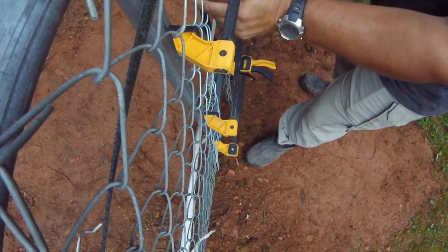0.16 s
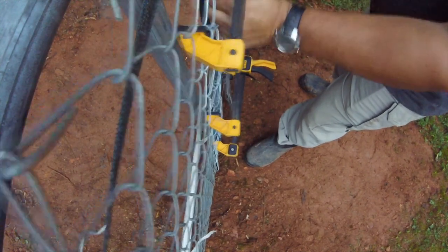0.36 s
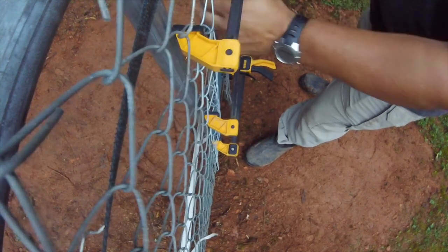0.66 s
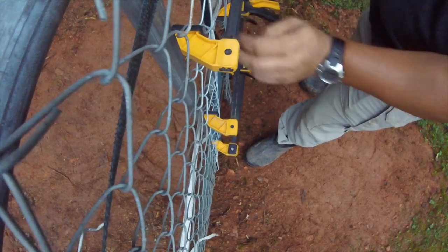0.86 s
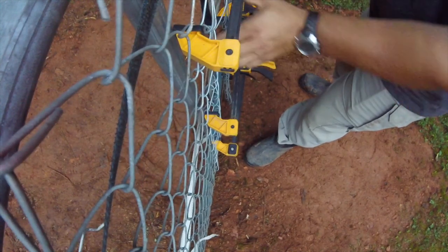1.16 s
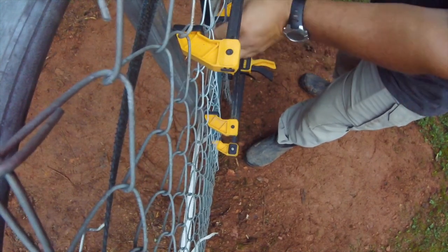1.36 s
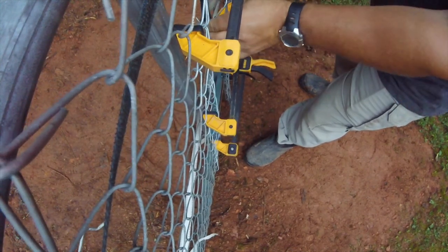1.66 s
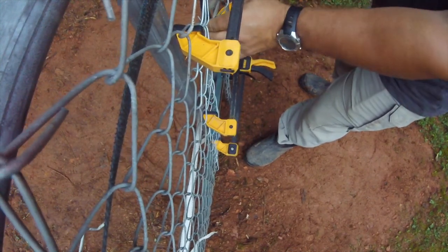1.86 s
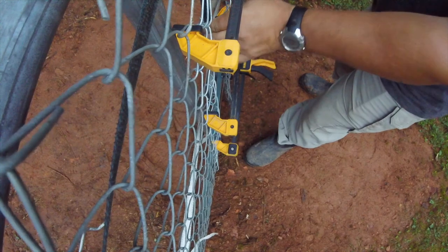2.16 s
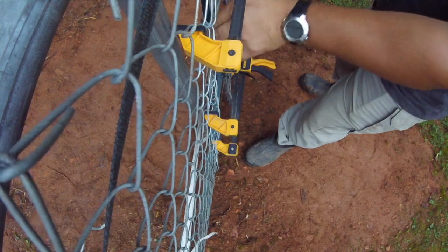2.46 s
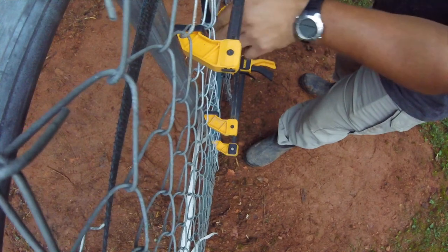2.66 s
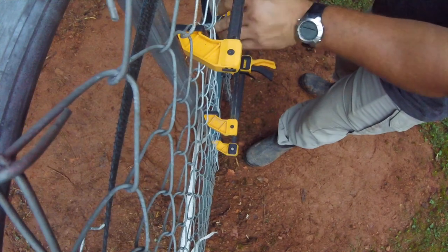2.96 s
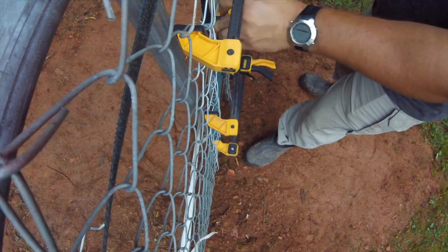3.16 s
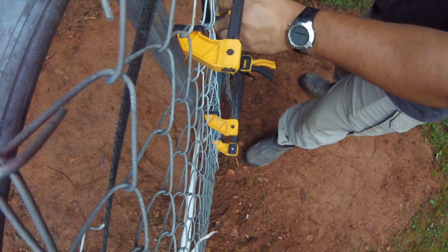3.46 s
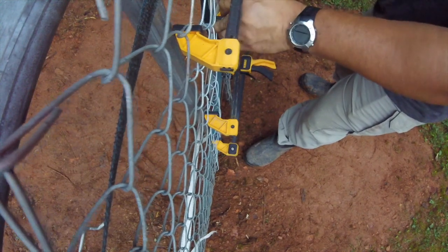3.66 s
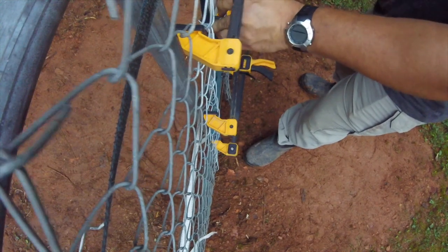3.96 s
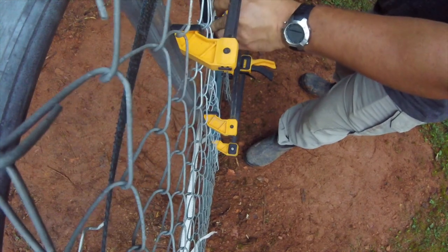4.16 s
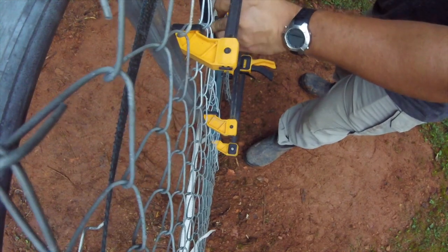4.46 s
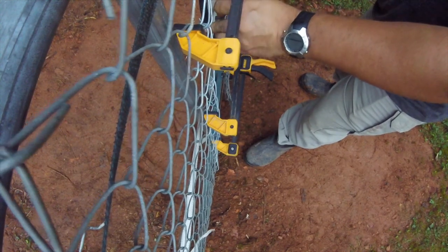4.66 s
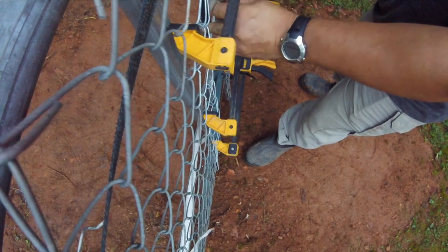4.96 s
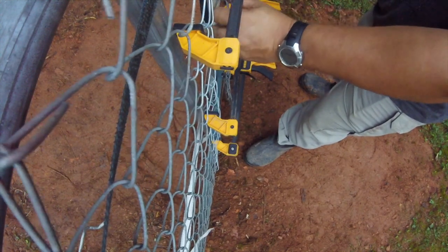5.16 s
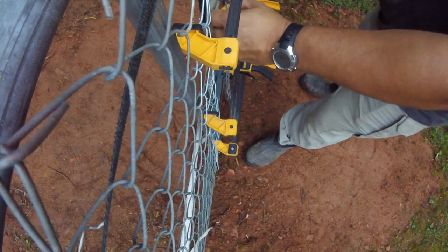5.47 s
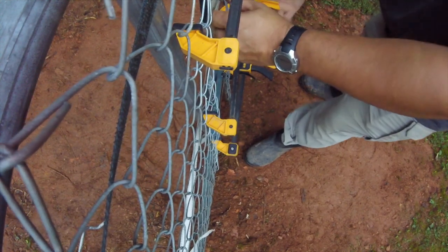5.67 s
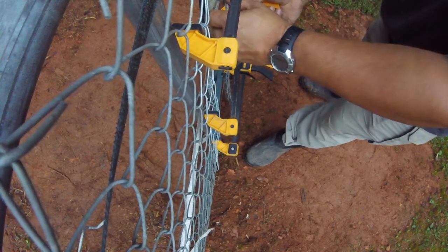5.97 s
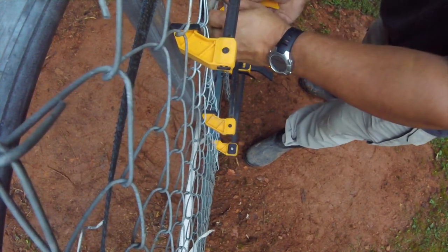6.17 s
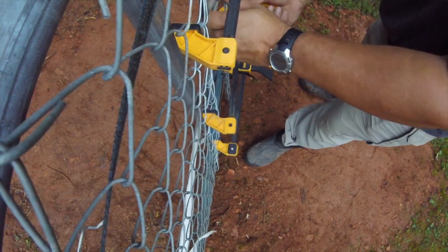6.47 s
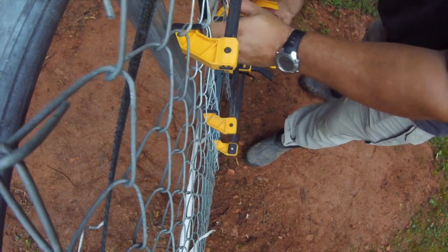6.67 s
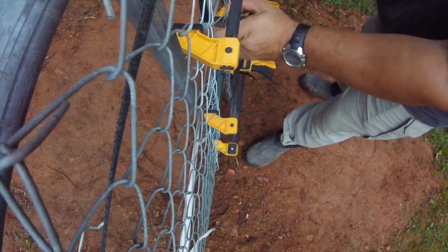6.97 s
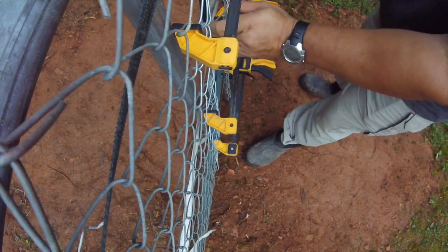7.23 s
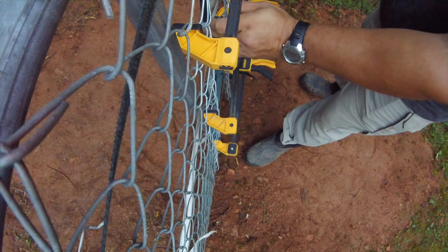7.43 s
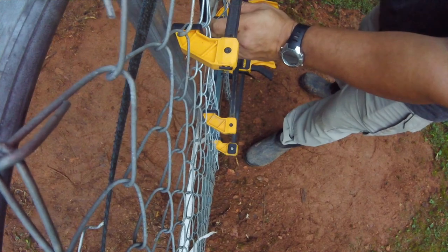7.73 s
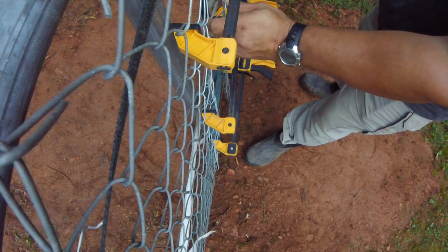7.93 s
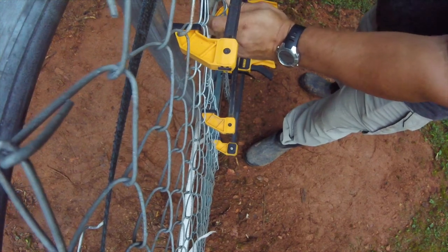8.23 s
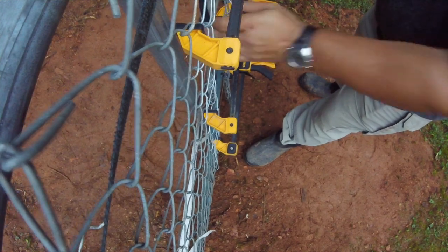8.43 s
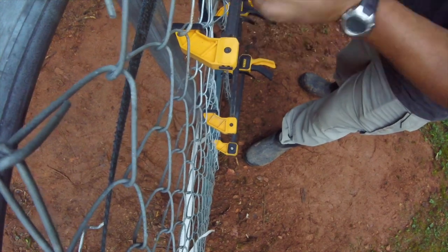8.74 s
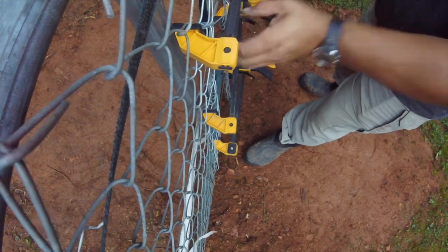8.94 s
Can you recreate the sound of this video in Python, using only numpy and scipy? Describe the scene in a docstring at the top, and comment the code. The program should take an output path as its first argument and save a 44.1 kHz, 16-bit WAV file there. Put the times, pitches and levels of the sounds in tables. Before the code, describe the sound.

Heard very close on a wire fence in a quiet yard, the mesh sways with a low rumble and dull rattles. Sharp knocks and a short metallic ring come at the start, followed by a calmer stretch of light ticks. Then a plastic clamp knocks irregularly as it is squeezed tight, and more thumps and rattles of the links come toward the end, over a faint outdoor hiss.

```python
"""A low rumble and dull rattles: a hand works plastic bar clamps on a chain-link fence, mic on the mesh.
Every push and jolt shakes the fence; its links rub and give small bright ticks. A steel clamp bar
clashes on the wire and rings; the clamp knocks as it is squeezed tight. Behind it all, the faint
hiss of a quiet yard and a far, arching whistle."""
import sys
import numpy as np
from scipy import signal
from scipy.fft import rfft, irfft, next_fast_len
from scipy.io import wavfile
from scipy.ndimage import uniform_filter1d

SR = 44100
rng = np.random.default_rng(int(sys.argv[2]) if len(sys.argv) > 2 else 0)


def waveform_to_disk(signal):
    """Save audio, clipped to [-1, 1], as 16-bit WAV at the path in sys.argv[1]."""
    frames = np.transpose(np.atleast_2d(signal))
    scaled = np.clip(frames, -1, 1) * 32767
    samples = np.round(scaled).astype(np.int16)
    wavfile.write(sys.argv[1], SR, samples)


N = 401310
TIME_S = np.arange(N) / SR

# hand effort, as mesh sway: t/s, level/dB
HAND_EFFORT = [(0, -40), (.17, -45.5), (.42, -38), (.62, -51), (1.33, -58.5), (1.58, -53.5), (1.8, -59.5),
               (2.65, -54.5), (3.15, -58), (3.4, -64.5), (4.3, -52.5), (4.7, -58), (5.7, -56.5),
               (6.5, -49.5), (6.9, -57), (7.8, -57.5), (8.48, -43.5), (9.1, -54.5)]
# pushes on the mesh: peak t/s, length/s, sway/dB, rub/dB
HAND_PUSHES = [(0.861, 0.11, -50.5, -80), (2.77, 0.21, -53, -78), (3.154, 0.33, -57.5, -77),
               (3.554, 0.085, -52.5, -88), (3.737, 0.24, -53.5, -78), (3.932, 0.1, -48, -77),
               (4.122, .12, -56, -73.5), (4.532, 0.17, -49, -66.5), (4.877, 0.28, -47, -78),
               (5.113, 0.08, -50, -91), (5.223, 0.062, -62, -67.5), (5.394, 0.091, -57, -80),
               (6.241, 0.041, -40, -85), (6.64, 0.22, -50.5, -74.5), (7.045, 0.22, -51.5, -82),
               (7.44, 0.065, -47, -93), (7.531, 0.072, -42, -76), (7.665, 0.23, -44.5, -74.5),
               (8.127, 0.14, -39, -72), (8.992, 0.15, -45.5, -75)]
# jolts of the mesh: t/s, rattle/dB, thump/dB, t60/s
MESH_JOLTS = [(0.015, -54.5, -44, 0.18), (.163, -60.5, -66, 0.14), (.224, -56, -58, 0.24),
              (.276, -50.5, -39.5, 0.52), (0.329, -44.5, -34, 0.18), (0.406, -33, -31.5, 0.046),
              (2.285, -67, -43.5, 0.46), (2.384, -57, -43, 0.083), (4.42, -55.5, -52, 0.15),
              (5.846, -68, -41.5, 0.54), (6.392, -44, -41, 0.28), (7.873, -61, -43.5, 0.74),
              (8.086, -56, -46.5, 0.37), (8.336, -56.5, -33, 0.33), (8.372, -46, -35, 0.17),
              (8.460, -54, -39.5, 0.24), (8.593, -58.5, -63, 0.17), (8.743, -59, -47, 0.29),
              (8.997, -64.5, -45.5, 0.78)]
# mesh sway: f/Hz, level/dB
SWAY_SPECTRUM = [(20, -41), (35, -24), (52, -3), (70, 1.5), (85, 2), (110, -3), (140, -8.5), (170, -11.5),
                 (210, -21), (300, -37.5)]
# fence frame: f/Hz, level/dB, t60/s
SHUDDER_MODES = [(159, -5.5, 0.057), (265.6, -1, 0.16), (316.5, -3.5, 0.053), (421, -9.5, 0.049)]
# rattling mesh: f/Hz, level/dB, t60/s
RATTLE_MODES = [(434.4, -3, 0.098), (620, -11, 0.058), (688, -8.5, 0.058), (780, -2.5, 0.048),
                (902, -3.5, 0.038), (1020, -2.5, 0.036), (1096, -3.5, 0.042), (1295, -10, 0.052),
                (1587, -10, 0.025), (1963, -6.5, 0.0093), (2840, -21, 0.027)]
# rubbing links: f/Hz, level/dB, t60/s
LINK_MODES = [(435, -10.5, 0.12), (665, -3, 0.081), (818, -9.5, 0.041), (938, 0.5, 0.045), (1042, 1, 0.043),
              (1228, -3, 0.028), (1870, -9, 0.021)]
# yard background: f/Hz, level/dB
YARD_SPECTRUM = [(20, 22), (60, 19), (160, 4.5), (400, -9), (700, -12.5), (1300, -8.5), (1900, -11),
                 (2900, -13), (3700, -17), (4500, -18), (5100, -9), (5950, -11), (6550, -2.5), (7100, -11),
                 (9000, -15.5), (10500, -24), (13000, -18.5), (14500, -54)]
# clicks of wire and clamp parts: t/s, level/dB
WIRE_TICKS = [(.2298, -64), (0.3076, -50.5), (0.327, -38), (0.4054, -40.5), (.4714, -61), (.6559, -59.5),
              (0.813, -60.5), (1.04, -67.5), (1.447, -65), (2.1045, -69), (2.4067, -67), (2.6713, -59),
              (2.8737, -67), (3.082, -69), (4.2, -67), (5.045, -65.5), (5.187, -63.5), (5.4795, -67.5),
              (5.8183, -58), (6.4022, -57.5), (8.084, -60), (8.368, -56), (8.458, -60), (8.588, -60.5),
              (8.741, -61), (8.8996, -64.5), (8.9962, -65.5)]
# tick sizzle: f/Hz, level/dB
TICK_SPECTRUM = [(1200, 9), (2000, -1.5), (3000, 1.5), (4200, 2.5), (5300, 8), (7800, 1.5), (10300, -10),
                 (11300, -18), (12300, -65)]
# bar striking wire: t/s, low modes/dB, high modes/dB
BAR_STRIKES = [(0.328, -57, -47.5), (0.407, -61, -52.5), (.428, -52, -90), (5.349, -83, -91),
               (8.420, -81, -88), (8.558, -80, -85)]
# steel bar: f/Hz, level/dB, t60/s
STEEL_MODES = [(2676.6, 0, .7), (2692, -13, .6), (2795, -14, .4), (2922, -18, .4), (2962, -18, .4),
               (3038, -16, .4), (3112, -24, .6), (6448, -11, .3), (6605, -9, .3), (7170, -9, .2),
               (7485, -10, .25), (7546, 0, .25), (7650, -6, .2), (7700, -11, .2), (8317, -13, .25)]
# crack of a bar strike: f/Hz, level/dB
CRACK_SPECTRUM = [(3000, -35), (6000, -31), (7600, 4), (9800, 0), (11000, -10), (11800, -37), (12600, -40)]
# clamp knocks: t/s, level/dB, extra bass/dB
CLAMP_KNOCKS = [(0.33, -28, -12), (.4000, -26.5, -3), (.4250, -29, 3.5), (0.8715, -39, -3),
                (1.439, -43, -1), (2.2855, -57, 19), (2.378, -51.5, 13), (4.051, -33.5, -1.5),
                (4.209, -46, 0), (4.3058, -37, 0.5), (4.4946, -34, 1), (4.8857, -33.5, -3),
                (5.059, -39.5, 1), (5.3462, -29.5, 0.5), (5.9665, -39, 3.5), (6.0454, -32.5, -3),
                (6.1364, -36.5, 1), (6.27, -46.5, 0), (6.354, -30.5, -1), (6.388, -45.5, 1),
                (7.111, -39, 3), (7.8629, -33.5, -5)]
# knock carried through the fence: f/Hz, level/dB, t60/s
CLAMP_MODES = [(91.5, -5, 0.039), (183, -2, 0.019), (270.9, -15, 0.17), (428, -13, .115), (575, -21, .05),
               (735, -18, .04), (936, -9.5, .068), (1055, -15, 0.037), (1222, -21.5, 0.051),
               (1590, -29.5, 0.041), (1825, -24, 0.039), (2333, -36.5, 0.033), (2864, -23.5, 0.022),
               (3115, -30.5, 0.031), (3390, -39.5, 0.02)]
# top of each whistle's arch: t/s
WHISTLE_PEAKS_S = [1.8, 3.42, 4.75, 6.1, 7.8]


def from_db(db):
    """Decibels to gain."""
    return 10 ** (np.asarray(db) / 20)


def unit_rms(x):
    """Scale to rms 1."""
    return x / np.sqrt(np.mean(x ** 2) + 1e-20)


def add(track, t_s, sound):
    """Mix a sound in from t_s."""
    start = max(round(t_s * SR), 0)
    track[start:start + len(sound)] += sound[:max(N - start, 0)]


def decay(t60_s):
    """Exponential decay, 1 s long."""
    return from_db(-60 * TIME_S[:SR] / t60_s)


def swell(length_s):
    """Half-sine rise and fall."""
    return np.sin(np.linspace(0, np.pi, int(length_s * SR)))


def drift(points):
    """Random values joined by lines; rms 1."""
    return unit_rms(np.interp(TIME_S, np.linspace(0, TIME_S[-1], points), rng.standard_normal(points)))


def contacts(per_s, spread_db):
    """Random tiny touches of uneven strength; rms 1."""
    touches = (rng.random(N) < per_s / SR) * rng.choice([-1, 1], N)
    return unit_rms(touches * from_db(spread_db * rng.standard_normal(N)))


def lowpass(x, edge_hz):
    """A soft contact passes only the lows."""
    return signal.sosfilt(signal.butter(2, edge_hz, fs=SR, output="sos"), x)


def coloured(noise, spectrum):
    """Shape noise to a spectrum; rms 1."""
    hz, db = np.transpose(spectrum)
    size = next_fast_len(N)
    bins_hz = np.maximum(np.fft.rfftfreq(size, 1 / SR), 1)
    gain = from_db(np.interp(np.log(bins_hz), np.log(hz), db))
    return unit_rms(irfft(rfft(noise, size) * gain, size)[:N])


def ring(force, hz, t60_s):
    """One mode: a unit click starts a decaying unit sine."""
    radius, angle = from_db(-60 / (t60_s * SR)), 2 * np.pi * hz / SR
    return signal.lfilter([0, np.sin(angle)], [1, -2 * radius * np.cos(angle), radius ** 2], force + 1e-18)


def body(force, modes):
    """Parallel modes, neighbours in opposite phase."""
    return sum((-1) ** k * from_db(db) * ring(force, hz, t60_s) for k, (hz, db, t60_s) in enumerate(modes))


def shaken(force, modes):
    """A body with unit power gain for a white random force."""
    return body(force, modes) / np.linalg.norm(body(signal.unit_impulse(SR), modes))


def hand(waver_db=3, wavers_per_s=12):
    """Sway, shudder and rub envelopes: each follows the effort and swells with a push."""
    effort = from_db(np.interp(TIME_S, *np.transpose(HAND_EFFORT)))
    push, scrape = np.zeros(N), np.zeros(N)
    for peak_s, length_s, sway_db, rub_db in HAND_PUSHES:
        add(push, peak_s - length_s / 2, from_db(sway_db) * swell(length_s))
        add(scrape, peak_s - length_s / 2, from_db(rub_db) * swell(length_s))
    grip = effort * from_db(waver_db * drift(points=int(wavers_per_s * TIME_S[-1])))
    sway = np.hypot(effort, push)
    shudder = np.hypot(from_db(-17) * grip, from_db(-21.5) * push)
    rub = np.hypot(from_db(-24) * grip, scrape)
    return sway, shudder, rub


def mesh_rumble(envelope, steady_s=0.059, bass_edge_hz=42):
    """The mesh sways; the mic barely follows the slowest motion."""
    noise = coloured(rng.standard_normal(N), SWAY_SPECTRUM)
    local_rms = np.sqrt(uniform_filter1d(noise ** 2, int(steady_s * SR)) + 1e-4)
    highpass = signal.butter(4, bass_edge_hz, "high", fs=SR, output="sos")
    return lowpass(signal.sosfilt(highpass, envelope * noise / local_rms), edge_hz=480)


def frame_shudder(envelope):
    """Dense small contacts shake the frame's low modes."""
    force = envelope * contacts(per_s=1700, spread_db=1.5)
    return lowpass(shaken(force, SHUDDER_MODES), edge_hz=1000)


def link_rub(envelope, wander_db=3):
    """Links slip in uneven steps; the contact point wanders, so each mode swells on its own."""
    out = np.zeros(N)
    for hz, db, t60_s in LINK_MODES:
        slips = contacts(per_s=500, spread_db=3) * from_db(wander_db * drift(points=120))
        out += from_db(db) * ring(slips, hz, t60_s)
    return envelope * unit_rms(lowpass(out, edge_hz=4300))


def yard_hiss(level_db=-69):
    """Quiet yard: faint rumble, steady hiss."""
    return from_db(level_db) * coloured(rng.standard_normal(N), YARD_SPECTRUM)


def mesh_rattle(rise_s=0.0034):
    """Links chatter and die down after each jolt or clamp knock."""
    envelope = np.zeros(N)
    onset = 1 - np.exp(-TIME_S[:SR] / rise_s)
    for t_s, rattle_db, _, t60_s in MESH_JOLTS:
        add(envelope, t_s, from_db(rattle_db) * onset * decay(t60_s))
    for t_s, knock_db, _ in CLAMP_KNOCKS:
        add(envelope, t_s, from_db(knock_db - 25) * decay(t60_s=0.11))
    force = envelope * contacts(per_s=2500, spread_db=2)
    return lowpass(shaken(force, RATTLE_MODES), edge_hz=5500)


def fence():
    """Hand and jolts drive mesh and frame; the links rattle and rub."""
    sway, shudder, rub = hand()
    thump = np.zeros(N)
    for t_s, _, thump_db, t60_s in MESH_JOLTS:
        add(thump, t_s, from_db(thump_db) * decay(t60_s))
    rumble = mesh_rumble(np.hypot(from_db(-2.5) * sway, thump))
    frame = frame_shudder(np.hypot(from_db(4.5) * shudder, from_db(-8.5) * thump))
    return rumble + frame + mesh_rattle() + link_rub(rub)


def settling_ticks(per_s=4, level_db=-73, spread_db=3):
    """Links settle at random; rows of t/s, level/dB."""
    draws = rng.random((int(per_s * TIME_S[-1]), 2))
    return [(when * TIME_S[-1], level_db + spread_db * (2 * size - 1)) for when, size in draws]


def wire_ticks(ring_db=-21.5, ring_t60_s=0.07, mode_count=32):
    """A snap, then a sizzle along loose links, whose high modes ring briefly."""
    snap = from_db(-10) * decay(t60_s=0.054)
    tail = from_db(-11) * decay(t60_s=0.22)
    envelope = np.zeros(N)
    for t_s, level_db in WIRE_TICKS + settling_ticks():
        add(envelope, t_s, from_db(level_db) * (snap + tail))
    sizzle = envelope * coloured(contacts(per_s=6000, spread_db=3), TICK_SPECTRUM)
    modes_hz = np.linspace(2800, 10500, mode_count) + rng.normal(0, 50, mode_count)
    return sizzle + from_db(ring_db) * shaken(sizzle, [(hz, 0, ring_t60_s) for hz in modes_hz])


def bar_clash(split_hz=4000):
    """Steel meets wire: a bright crack, then two clusters of close modes ring on."""
    ringing, crack = np.zeros(N), np.zeros(N)
    for t_s, low_db, high_db in BAR_STRIKES:
        add(crack, t_s, from_db(high_db + 2.5) * decay(t60_s=0.08))
        for hz, db, t60_s in STEEL_MODES:
            strike_db = low_db if hz < split_hz else high_db
            tone = np.sin(2 * np.pi * hz * TIME_S[:SR])
            add(ringing, t_s, from_db(strike_db + db) * decay(t60_s) * tone)
    return ringing + crack * coloured(contacts(per_s=6000, spread_db=4), CRACK_SPECTRUM)


def clamp_knocks(trim_db=0.88, hard_db=-37, treble_db_per_db=0.46):
    """The clamp slips and catches, striking its modes a little differently each time; harder is brighter."""
    out, click = np.zeros(N), signal.unit_impulse(SR // 3)
    hz, db, t60_s = np.transpose(CLAMP_MODES)
    peak = np.abs(body(click, CLAMP_MODES)).max()
    treble = np.clip(np.log2(hz / 900), 0, 1)
    bass = np.clip(np.log2(400 / hz), 0, 1)
    for t_s, level_db, bass_db in CLAMP_KNOCKS:
        treble_db = treble_db_per_db * (level_db - hard_db)
        modes_db = db + rng.standard_normal(len(hz)) + treble_db * treble + bass_db * bass
        add(out, t_s, from_db(level_db + trim_db) * body(click, zip(hz, modes_db, t60_s)) / peak)
    return out


def far_whistle(top_hz=4300, arch_hz=201, length_s=0.75, level_db=-96.5, flutter_db=4):
    """Each whistle rises and sinks in pitch; its level flutters."""
    out, arch = np.zeros(N), swell(length_s)
    phase = 2 * np.pi * np.cumsum(top_hz - arch_hz * (1 - arch)) / SR
    for peak_s in WHISTLE_PEAKS_S:
        add(out, peak_s - length_s / 2, arch * np.sin(phase))
    return out * from_db(level_db + flutter_db * drift(points=500))


def scene():
    """All sources at one mic on the fence."""
    return (clamp_knocks() + fence() + wire_ticks() + bar_clash() + far_whistle() + yard_hiss())[None]


def record(dry):
    """Steep low-pass, 60 dB down from 14 kHz."""
    return signal.sosfilt(signal.cheby2(14, 60, 14000, fs=SR, output="sos"), dry)


dry = scene()
out = record(dry)
waveform_to_disk(out)
```